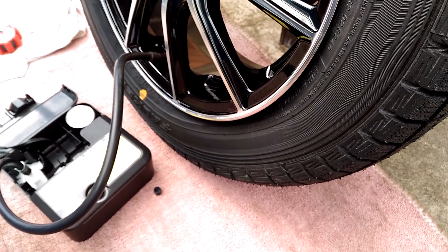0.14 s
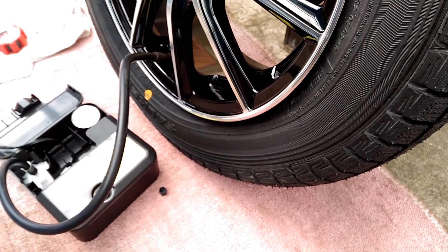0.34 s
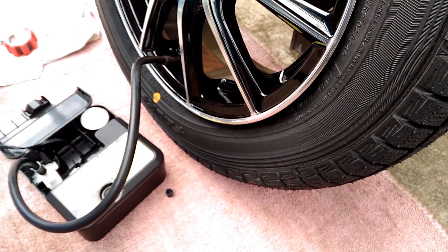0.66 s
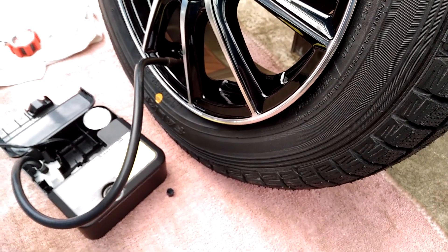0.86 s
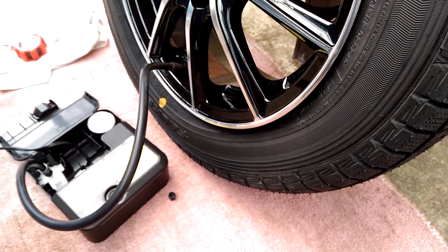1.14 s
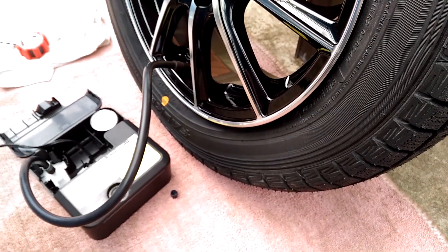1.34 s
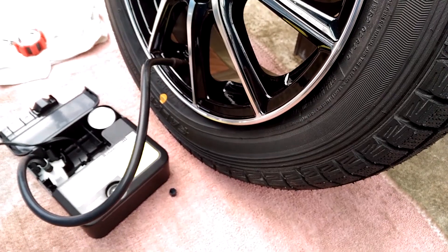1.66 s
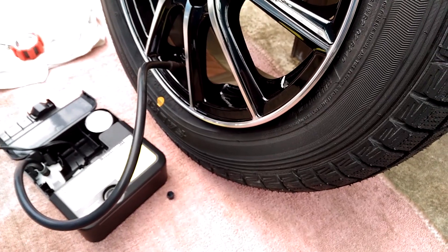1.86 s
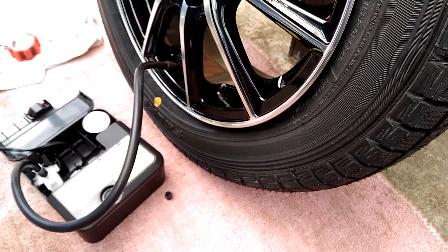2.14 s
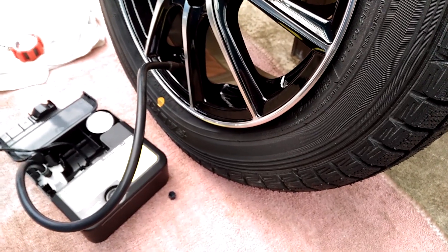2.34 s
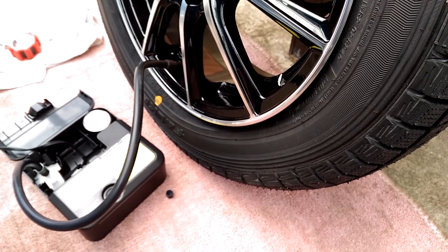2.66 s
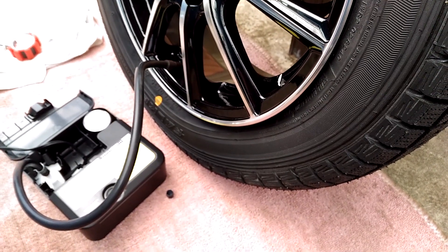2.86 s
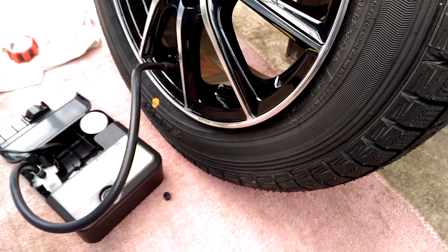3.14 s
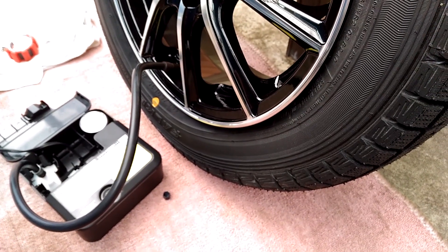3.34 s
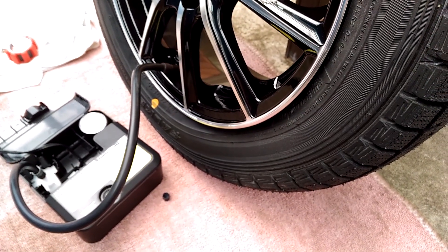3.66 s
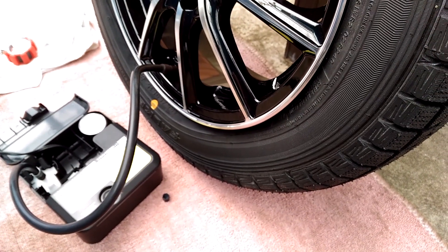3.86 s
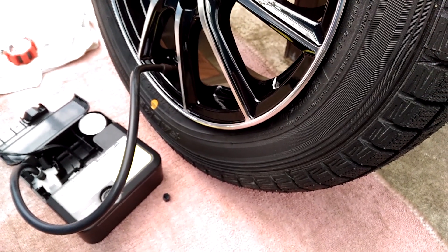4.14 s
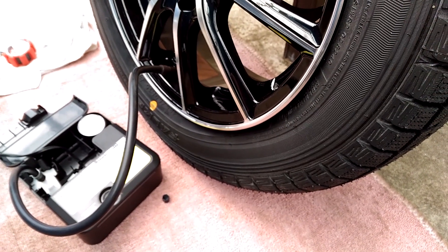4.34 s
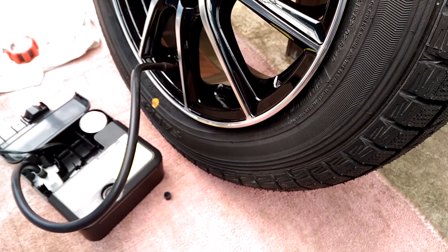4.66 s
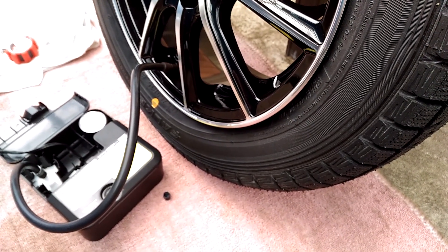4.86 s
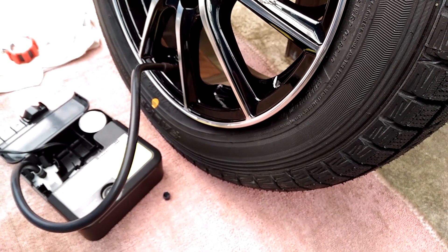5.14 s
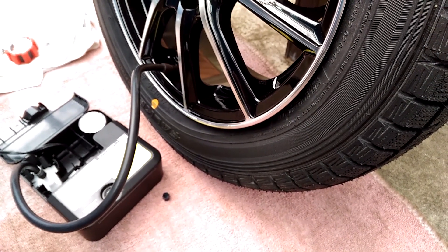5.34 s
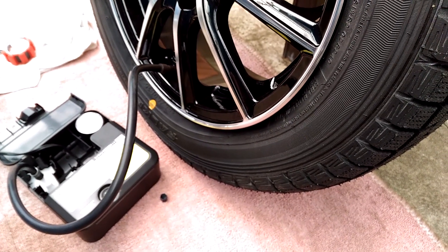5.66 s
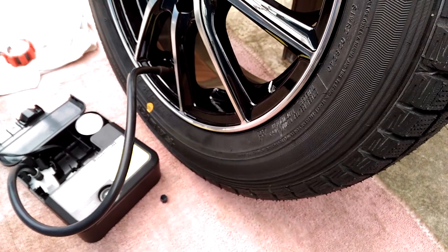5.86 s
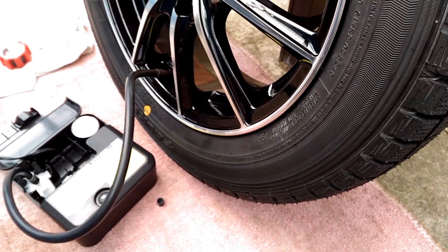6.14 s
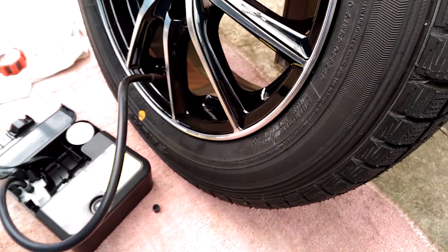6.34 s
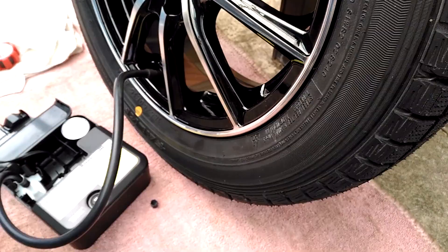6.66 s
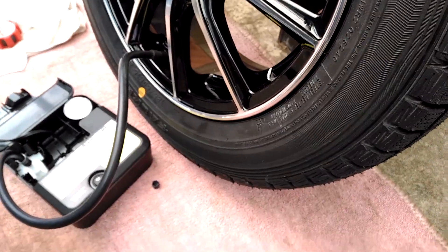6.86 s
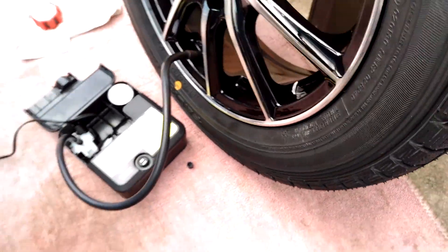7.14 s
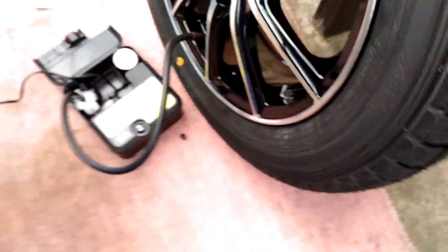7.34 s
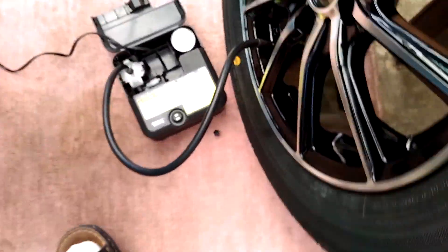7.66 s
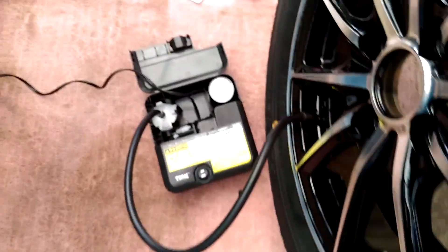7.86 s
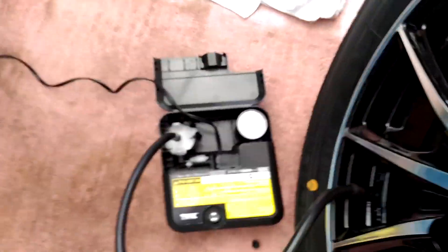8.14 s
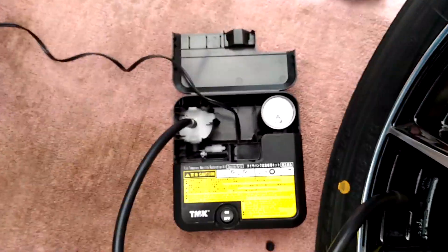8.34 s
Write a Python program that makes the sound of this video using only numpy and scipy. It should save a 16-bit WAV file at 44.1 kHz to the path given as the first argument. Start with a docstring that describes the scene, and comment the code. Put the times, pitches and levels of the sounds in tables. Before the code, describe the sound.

A sharp snap from a tyre opens over a small piston compressor's steady buzzing rattle, with light low wind thumps on a hand-held microphone.

```python
"""A tyre bead snaps onto the rim at once: a noise crack, then the air ring inside sings in fading sines.
All along, a small piston compressor on a mat fills the car tyre: blows of each crank turn ring the case,
pinion ticks rattle, sines locked to crank and motor hum and whine, and filtered noise whistles at the intake.
The hand-held phone moves from beside the case to over it, away, over it again and at last draws back;
light wind rumbles on its microphone throughout, with short thumps from about two seconds on."""
import sys
import numpy as np
from scipy import signal
from scipy.fft import rfft, irfft
from scipy.io import wavfile
from scipy.ndimage import uniform_filter1d, minimum_filter1d

SR = 44100
rng = np.random.default_rng(int(sys.argv[2]) if len(sys.argv) > 2 else 0)


def transcribe(signal):
    """Save signal, clipped to [-1, 1], as a 16-bit WAV file at the path in sys.argv[1]."""
    frames = np.atleast_2d(signal).T
    limited = np.clip(frames, -1, 1)
    pcm = np.round(limited * 32767).astype(np.int16)
    wavfile.write(sys.argv[1], SR, pcm)


N = 374850
TIME = np.arange(N) / SR  # s

# In every table, levels by place run: beside the case, tilted, over it, drawn back.

# Crank speed, a little lower at the end as the tyre fills. Each row: time in seconds, turns per second.
CRANK_SPEED = [(0, 47.6115), (1.75, 47.5635), (2.5, 47.6965), (4.25, 47.6147), (5.75, 47.6289),
               (8.5, 47.4177)]
TURNS = np.cumsum(np.interp(TIME, *np.transpose(CRANK_SPEED))) / SR  # crank turns so far
CRANK_ANGLE = 2 * np.pi * TURNS  # rad
GEAR = 52 / 11  # motor turns per crank turn

# Blows in each crank turn: piston at the top, valve bounces, rod reversals.
# Each row: moment as a share of a turn, relative thud level in dB, relative click level in dB.
KNOCKS = [(.951, 5, 8.5), (0.99, -5.5, -4.5), (1.031, -5, -3.5), (1.114, -7.5, -2), (1.293, -6.5, -15),
          (1.48, -3, -10.5), (1.65, -12.5, -46), (1.849, -5, -12)]


def undb(db):
    """Amplitude factor of a level in dB."""
    return 10 ** (np.asarray(db) / 20)


def unit(x):
    """Scale to rms 1."""
    return x / np.sqrt(np.mean(x ** 2))


def ring(x, hz, width_hz):
    """Two-pole resonance, gain 1 at the centre."""
    return signal.lfilter(*signal.iirpeak(hz, hz / width_hz, fs=SR), x)


def walk(rate):
    """Slow random wander, rms 1, from noise steps at this rate in Hz smoothed twice."""
    step = int(SR / rate)
    steps = np.repeat(rng.standard_normal(N // step + 1), step)
    smooth = uniform_filter1d(uniform_filter1d(steps, step), step)
    return unit(smooth[:N])


def colour(x, spectrum):
    """Shape the spectrum by (Hz, dB) points joined on a log frequency axis."""
    hz, db = np.transpose(spectrum)
    log_hz = np.log(np.fft.rfftfreq(N, 1 / SR) + 1)
    return irfft(rfft(x) * undb(np.interp(log_hz, np.log(hz), db)), N)


def by_place(place, levels_db):
    """Gain blended in dB between the listening places."""
    return undb(np.interp(place, range(len(levels_db)), levels_db))


def blows(place):
    """Soft thud and hard click impulses for every knock of every turn, slightly uneven in time and force."""
    # How far the later blows of a turn stand out: levels by place in dB.
    later_db = [-6, 3.5, 2.5, 2]
    share, *levels_db = np.transpose(KNOCKS)
    at_turn = np.arange(int(TURNS[-1]) + 2)[:, None] - 2 + share
    chance = rng.standard_normal((len(at_turn), 3, len(share)))
    when = np.interp(at_turn, TURNS, TIME, left=-1, right=TIME[-1] + 1)
    when = when + .000015 * chance[:, 0]  # s of jitter
    keep = (when >= 0) & (when < TIME[-2])
    whole, part = (when[keep] * SR).astype(int), when[keep] * SR % 1
    heard = np.where(share > 1.07, by_place(np.interp(when, TIME, place), later_db), 1)
    trains = []
    for k, db in enumerate(levels_db):
        size = (heard * undb(db + .55 * chance[:, 1 + k]))[keep]
        # each impulse is shared between two samples
        early = np.bincount(whole, size * (1 - part), N)
        late = np.bincount(whole + 1, size * part, N)
        trains.append(early + late)
    return trains


def case(place):
    """Knocks, the air that hisses after each click and the steady gear rattle all ring the plastic case."""
    # Modes of the case. Each row: frequency in Hz, width in Hz, then levels by place in dB.
    modes = [(239.5, 27, -22, -9, -11, -9.5), (359, 17, -24, -9, -9.5, -36), (387.5, 20, 1, -11, -5, -8.5),
             (428.8, 13.7, 0, -7.5, -1.5, 1.5), (493, 49, -27, -10, -13, -8),
             (566.4, 12.3, -3.5, 1, -6, -5), (676, 64, -27, -12, -2, 1), (736, 62.7, 3, -1, -8, 1),
             (962.7, 20.5, -21, -9, -5, -8.5), (1025, 168, 2.5, -4, -41, -34),
             (1140.4, 7.3, -45, -4.5, -10.5, -11), (1190.5, 12.5, -3.5, -3.5, -1.5, -1.5),
             (1348, 118, -28, -13.5, -10, -9.5), (1528, 96, -34, -13, -16, -10),
             (2007, 184, -58, -29, -15, -38), (2490, 95, -23, -19, -15.5, -15),
             (2770, 144, -21, -20.5, -33.5, -27), (3544, 670, -19, -36, -20.5, -31.5),
             (4110, 390, -17, -40, -32, -20), (4670, 150, -42, -31, -23, -20.5),
             (5150, 144, -47, -45, -16.5, -24), (6040, 500, -41.5, -65, -20.5, -25.5),
             (7160, 320, -26, -48, -32, -30)]
    thuds, clicks = blows(place)
    thud = signal.lfilter(*signal.butter(2, 1800, fs=SR), thuds)  # the blow has a soft edge
    click = signal.lfilter(*signal.butter(2, (2000, 9000), "band", fs=SR), clicks)
    hits = undb(-24.5) * unit(thud) + undb(-24.0) * unit(click)

    puffs = signal.lfilter([1], [1, -np.exp(-1 / (0.00087 * SR))], clicks)  # decay time in s
    bright = signal.lfilter(*signal.butter(1, 2500, "high", fs=SR), rng.standard_normal(N))
    # steady rattle plus a puff after each click
    air = undb(-16.5) * (0.95 + unit(puffs) * 0.29) * bright

    # heard straight through the air
    out = undb(-53.5) * unit(ring(ring(click, 2560, 1500), 2060, 2400))
    for hz, width_hz, *db in modes:
        # each panel takes up the rattle unevenly, on its own
        drive = hits + air * undb(0.57 * walk(40))
        out = out + by_place(place, db) * ring(drive, hz, width_hz)
    return out


def tones(place):
    """Piston and geared-motor hum; motor tones swell and waver as the piston loads the shaft."""
    # Tones locked to the crank. Each row: multiple of crank rate, then rms levels by place in dB.
    stroke_tones = [(1, -58, -55, -59.5, -60), (2, -58, -61, -55, -55.5), (3, -84, -68, -83, -81),
                    (4, -88, -73, -84, -100), (14, -51, -44, -39, -47.5)]
    # Each row: multiple of motor rate, levels by place in dB before the load swing, depth of that swing.
    motor_tones = [(2, -71, -69, -65, -68, 1.4), (3, -57.5, -45, -42, -44.5, 0.79),
                   (4, -45, -70, -74.5, -101, 2.7), (5, -77, -61, -53.5, -58, 2.3),
                   (7, -64, -49, -49, -58, 0.25)]
    load = np.cos(CRANK_ANGLE + .5)
    out = 0
    for k, *db in stroke_tones:
        waver = undb(0.092 * k * walk(25))
        out = out + by_place(place, db) * waver * np.cos(k * (CRANK_ANGLE + 0.32))
    start_turns = 0.018
    motor_angle = GEAR * CRANK_ANGLE + 2 * np.pi * start_turns + 0.11 * np.sin(CRANK_ANGLE + 1.84)
    for k, *db, depth in motor_tones:
        out = out + by_place(place, db) * (1 + depth * load) * np.cos(k * motor_angle)
    return np.sqrt(2) * out  # from rms to peak


def pinion(place):
    """A high spot on the motor pinion ticks once a motor turn, hardest under load: a gritty rattle."""
    # Rattle levels by place in dB.
    pinion_db = [-58, -44.5, -45.5, -51]
    at_turn = np.arange(1, int(TURNS[-1] * GEAR)) / GEAR
    chance = rng.standard_normal((len(at_turn), 2))
    size = (1 + .8 * np.cos(2 * np.pi * at_turn - 1.5)) * undb(3.5 * chance[:, 0])
    when = np.interp(at_turn, TURNS, TIME) + .0001 * chance[:, 1]  # s, with jitter
    ticks = np.bincount(np.clip(when * SR, 0, N - 1).astype(int), size, N)
    return by_place(place, pinion_db) * unit(ring(ring(ticks, 1070, 500), 1060, 710))


def whine(place):
    """Gear tones that waver and pulse with each stroke, in opposite phase when heard drawn back."""
    # Multiples of crank rate, one for each whine tone.
    orders = [51, 52, 107, 108, 109]
    # Each row, one per order: phase wander in rad, then levels by place in dB before the stroke pulse.
    whine_rows = [(0.1, -58, -55, -47.5, -48.5), (0.1, -55, -57, -69, -57), (0.5, -51, -53, -50, -54),
                  (0.5, -66, -54, -53.5, -68), (0.5, -66, -71, -57.5, -73)]
    top = 2 * np.pi * KNOCKS[0][0]  # in step with the main blow
    out = 0
    for k, (wander, *db) in zip(orders, whine_rows):
        # the sign flip makes each tone fade through zero on the way to the drawn-back place
        gain = np.interp(place, range(4), undb(db) * [1, 1, 1, -1])
        phase = k * (CRANK_ANGLE - top) + wander * walk(60)
        out = out + gain * undb(1.1 * walk(25)) * np.cos(phase)
    return np.sqrt(2) * out * (1 + 0.49 * np.cos(CRANK_ANGLE + 8.7))


def intake():
    """Air drawn in on the down stroke whistles in the treble: narrow noise that swells once a turn."""
    # Whistles of the air intake. Each row: frequency in Hz, width in Hz, middle level in dB.
    whistles = [(7930, 380, -51.5), (10320, 670, -58.5)]
    gate = 1 + 0.16 * np.cos(CRANK_ANGLE - 2.4)
    out = 0
    for hz, width_hz, db in whistles:
        whistle = unit(ring(rng.standard_normal(N), hz, width_hz))
        out = out + undb(db + 1.85 * walk(90)) * gate * whistle
    return out


def snap():
    """The bead seats: a crack, a rough tail, and the air ring that builds up and fades."""
    # Colour of the crack. Each row: frequency in Hz, relative level in dB.
    crack_colour = [(35, -33), (60, -7), (237, -12), (310, -5.5), (476, -11), (532, -3), (1400, -13),
                    (2810, -22), (7240, -23.5), (13000, -30.5)]
    # Air ring inside the tyre. Each row: frequency in Hz, level in dB, time to fall 60 dB in seconds.
    air_ring = [(240.7, -24, 1.46), (481, -18, 0.6), (720, -24, 0.39), (865, -9, 0.099), (135, 1, 0.096)]
    snap_s = .0813
    t = np.maximum(TIME - snap_s, 0)
    noise = unit(colour(rng.standard_normal(N), crack_colour))
    crack = undb(-13.5) * np.exp(-t / 0.014)
    tail = undb(-15) * np.exp(-t / 0.041)
    out = noise * (crack + tail)
    for hz, db, t60 in air_ring:
        build_up = 1 - np.exp(-t * hz / 9)
        out = out + undb(db) * np.sin(2 * np.pi * hz * t) * build_up * 1000 ** (-t / t60)
    return (TIME > snap_s) * out


def wind():
    """Short low thumps on the microphone, part tone and part flutter, over a wandering rumble."""
    # Each row: time in seconds, middle rumble level in dB.
    rumble = [(0, -65), (1.7, -63), (2.2, -61), (3.2, -52), (3.8, -59.5), (6, -61.5), (8.5, -63.5)]
    # Wind thumps. Each row: start in seconds, approximate peak level of the tone in dB, frequency in Hz.
    gusts = [(1.98, -44, 61.9), (2.24, -44, 53.8), (2.324, -46, 94.2), (2.406, -43, 72.7),
             (2.546, -43, 80.7), (2.712, -46, 51.1), (2.899, -49, 153), (3.134, -45, 61.9),
             (3.206, -37, 74.4), (4.074, -44, 72.7), (4.215, -36, 80), (4.24, -37.5, 122), (4.383, -40, 93),
             (5.047, -48, 77), (5.549, -47, 67.3), (5.66, -43, 70), (5.7, -43, 56.5)]
    gust_s = 0.028  # time scale of one thump
    low_band = signal.butter(2, (40, 130), "band", fs=SR, output="sos")
    low = unit(signal.sosfilt(low_band, rng.standard_normal(N)))
    flutter = unit(ring(rng.standard_normal(N), 200, 160))
    out = low * undb(np.interp(TIME, *np.transpose(rumble)) + 0.55 * walk(9.3))
    for (s, db, hz), start in zip(gusts, rng.random((len(gusts), 1))):
        u = np.clip((TIME - s) / gust_s, 0, 30)
        swell = 6 * u * np.exp(-2.5 * u)
        tone = np.sin(2 * np.pi * (hz * gust_s * u + start))
        out = out + undb(db) * swell * (tone + 0.27 * low + 0.41 * flutter)
    return out


def scene():
    """Pump as heard from the moving phone, plus snap and wind at levels the phone's path leaves alone."""
    # Path of the phone. Each row: time in seconds, level in dB, place (0 low beside the case, 1 tilted,
    # 2 over it, 3 and above drawn back).
    phone = [(0, -4, 0.5), (1.3, -4, 0.5), (1.7, -4, 1.28), (2.2, -5, 0.87), (2.45, -3, 2),
             (2.65, -4.5, 5.5), (2.9, -2.5, 3), (3.6, -1, 2), (4.2, -1, 2), (6.4, -1, 2), (7.7, -2.5, 3),
             (8.5, -2.5, 6)]
    s, *columns = np.transpose(phone)
    near_db, place = (np.interp(TIME, s, column) for column in columns)
    pump = case(place) + intake() + tones(place) + pinion(place) + whine(place)
    return (undb(near_db) * pump + snap() + wind())[None]


def record(dry):
    """A limiter that looks ahead ducks just before loud peaks; bass and top are cut."""
    # Colour of the microphone. Each row: frequency in Hz, gain in dB.
    mic = [(300, 1.5), (8100, 2.5), (8900, -10.5), (9700, 3), (10500, -7), (12000, -13), (14300, -13)]
    x = signal.sosfilt(signal.butter(2, 40, "high", fs=SR, output="sos"), colour(dry, mic))
    ahead = int(0.0092 * SR)  # samples of look-ahead
    peak = -minimum_filter1d(-np.abs(x), 2 * ahead + 1)
    # the held peak falls by a factor e in 0.06 s
    fall = np.arange(N) / (.06 * SR)
    held = np.exp(np.maximum.accumulate(np.log(peak + 1e-9) + fall, axis=1) - fall)
    gain = uniform_filter1d(np.minimum(1, undb(-9.5) / held), ahead // 2)
    top_cut = signal.ellip(10, .2, 70, 14200, fs=SR, output="sos")  # edge in Hz
    return signal.sosfilt(top_cut, x * gain)


dry = scene()
out = record(dry)
transcribe(out)
```